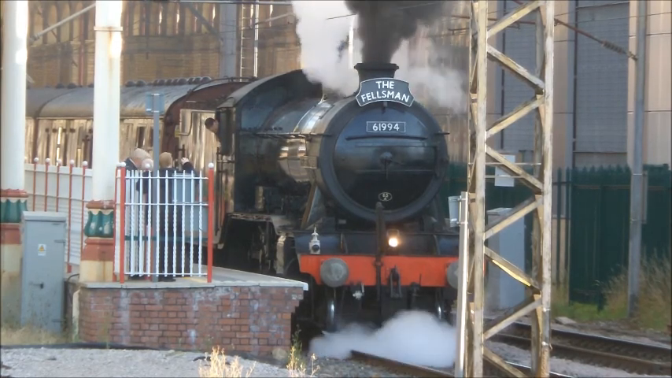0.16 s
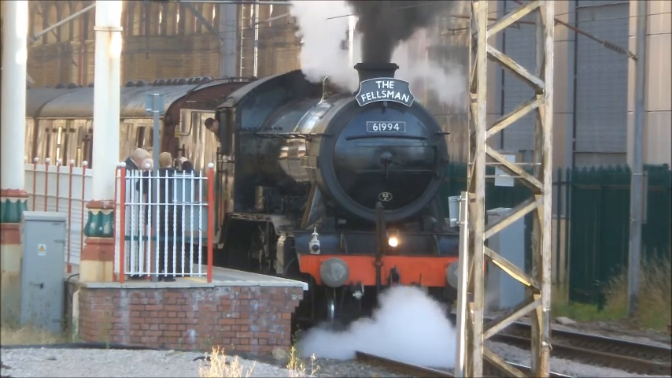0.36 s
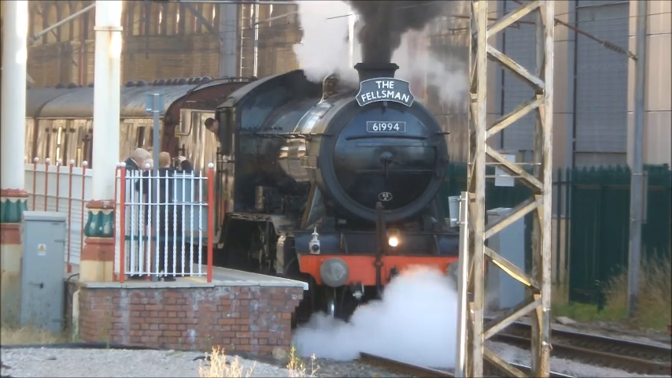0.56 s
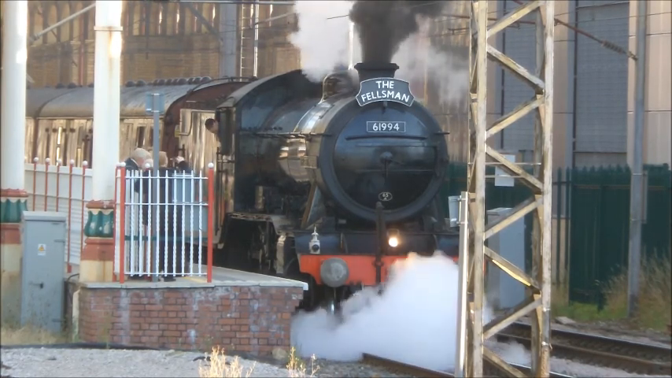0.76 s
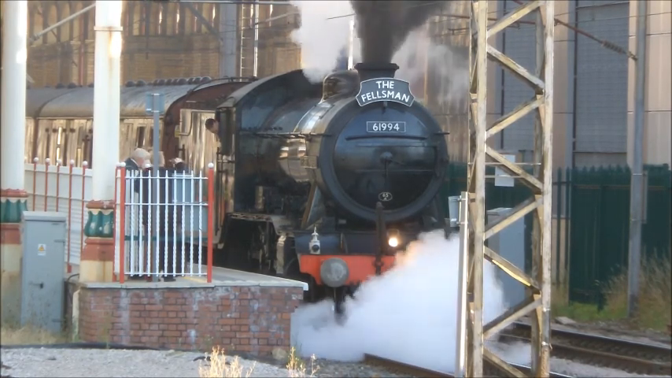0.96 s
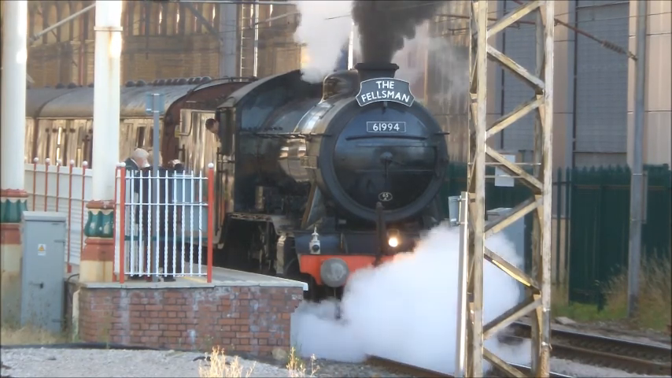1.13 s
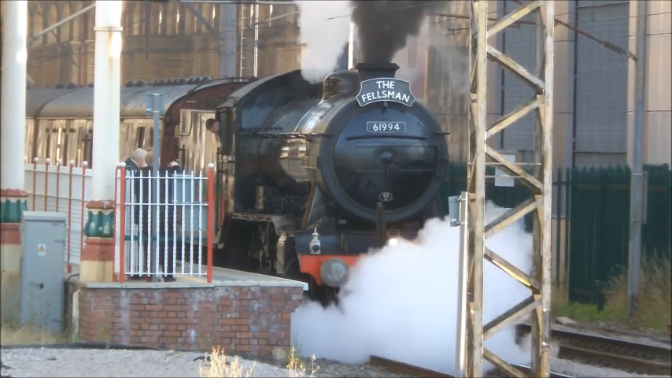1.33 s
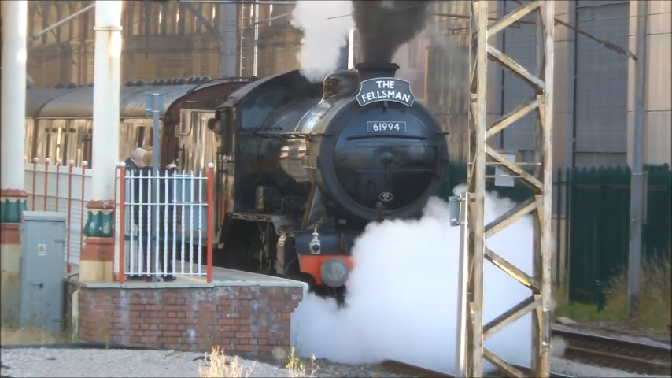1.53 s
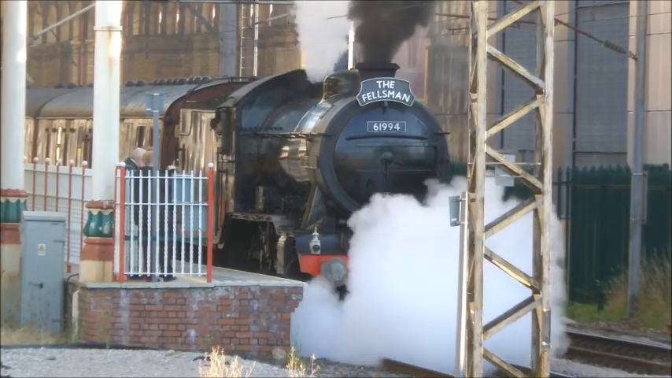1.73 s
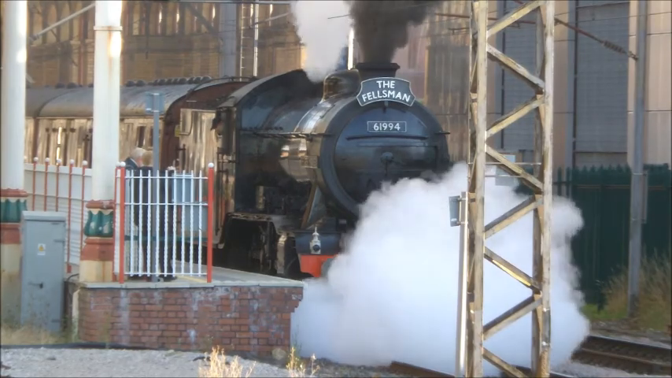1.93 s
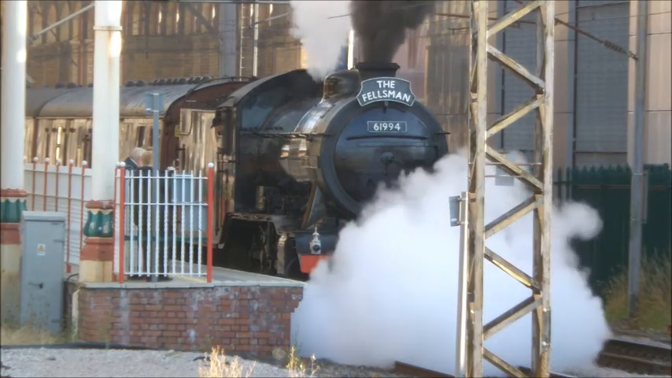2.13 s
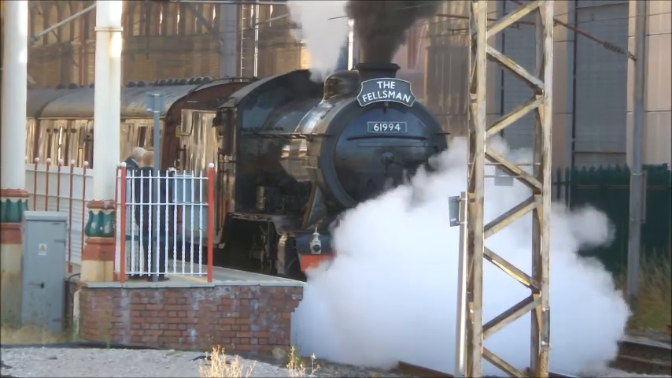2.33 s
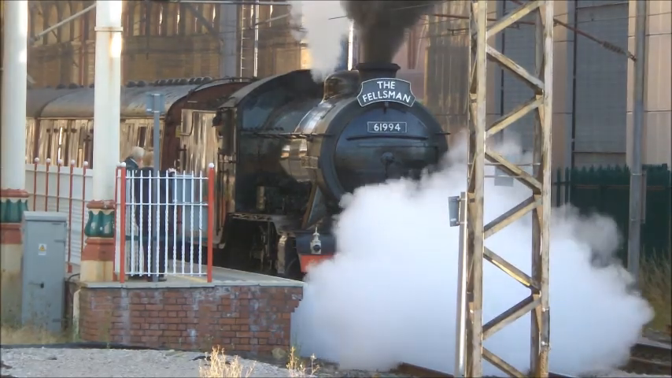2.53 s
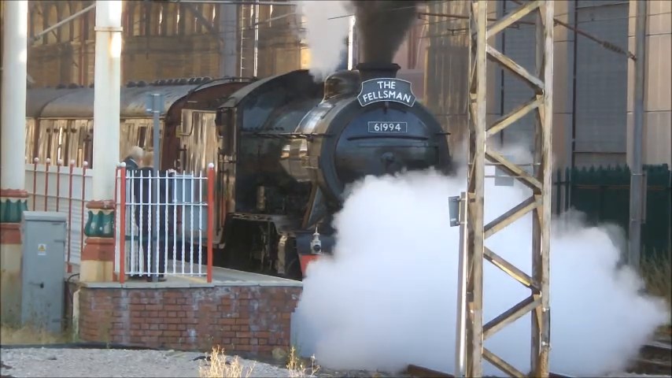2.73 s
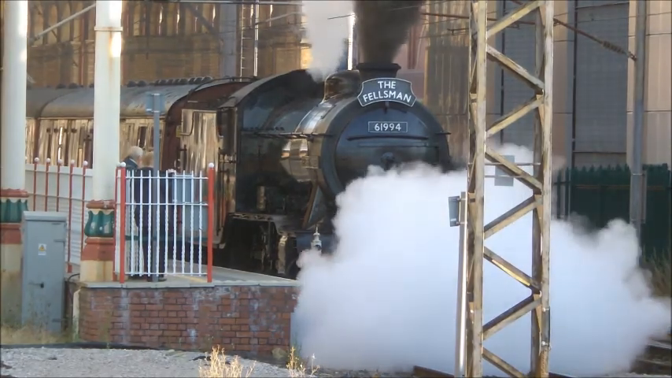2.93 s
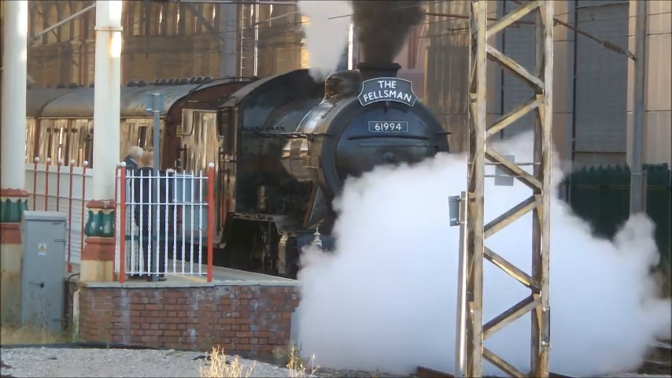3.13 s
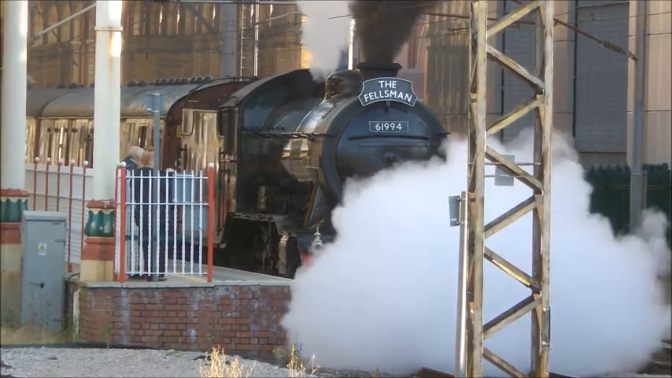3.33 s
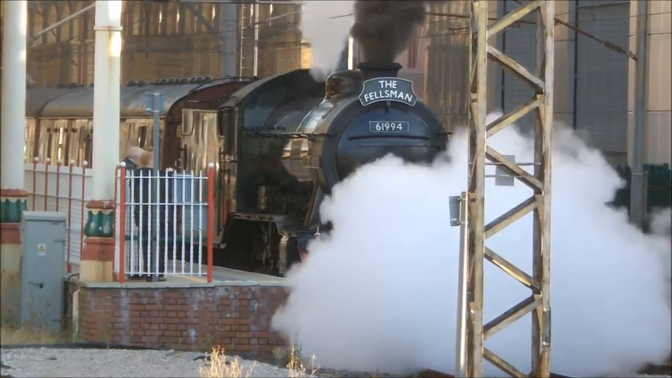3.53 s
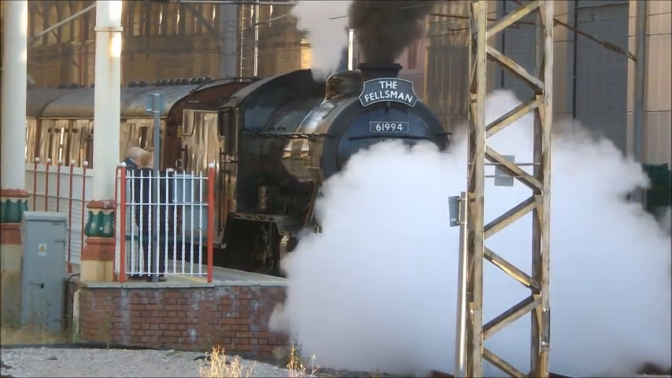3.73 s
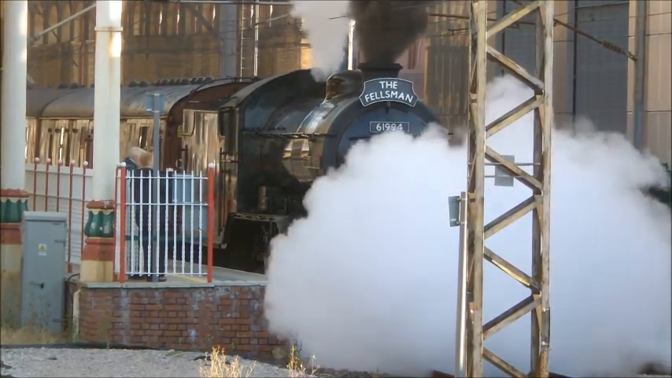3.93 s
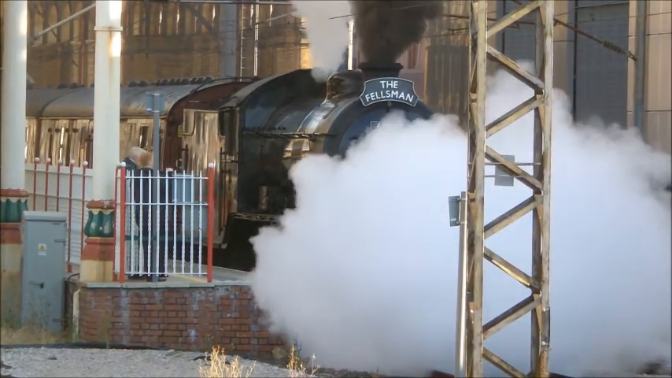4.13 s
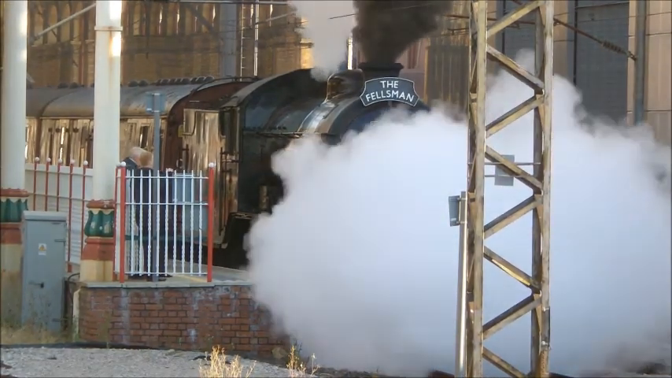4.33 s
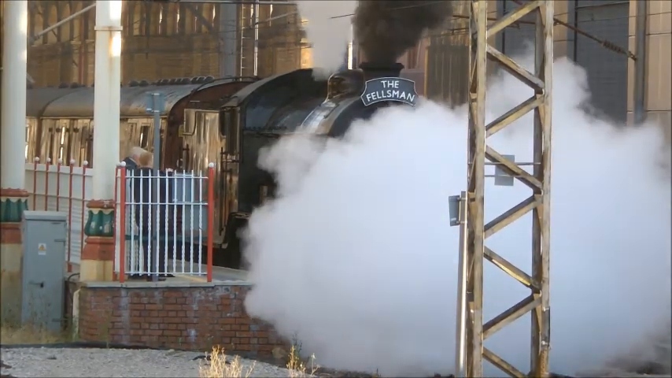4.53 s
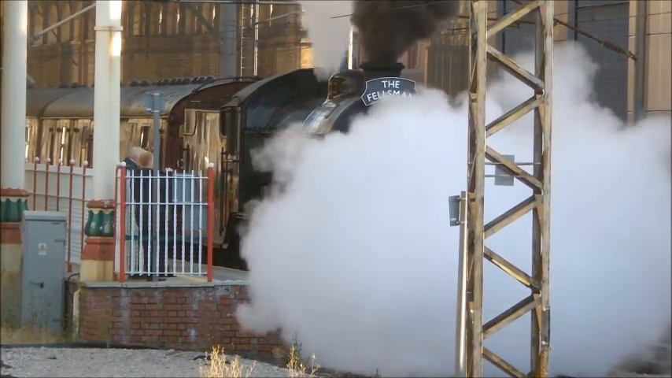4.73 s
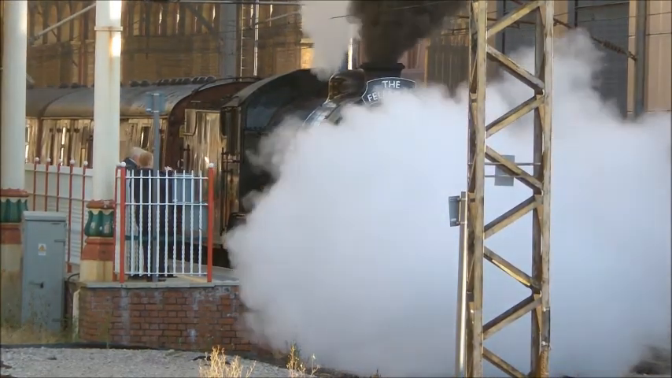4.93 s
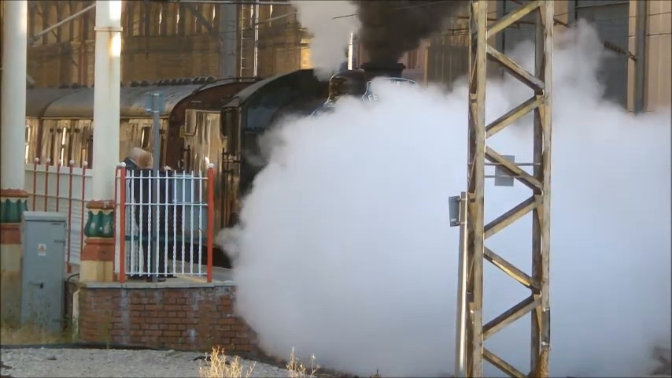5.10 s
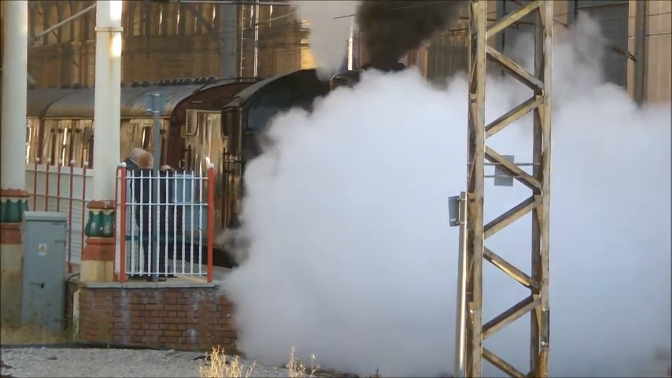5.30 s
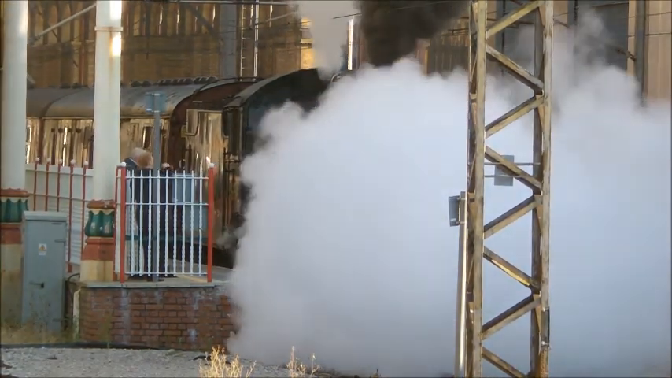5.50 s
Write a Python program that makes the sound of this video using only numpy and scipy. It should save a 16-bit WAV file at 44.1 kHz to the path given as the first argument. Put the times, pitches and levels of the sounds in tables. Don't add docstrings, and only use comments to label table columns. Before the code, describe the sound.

Quiet blower hiss from a standing steam engine grows within a second into loud, shifting jets of steam that last to the end.

```python
import sys
import numpy as np
from scipy import signal
from scipy.fft import rfft, irfft, next_fast_len
from scipy.io import wavfile
from scipy.ndimage import uniform_filter1d

SR = 44100
rng = np.random.default_rng(int(sys.argv[2]) if len(sys.argv) > 2 else 0)


def master_out(mix):
    frames = np.transpose(np.atleast_2d(mix))
    ceiling = np.clip(frames, -1, 1)
    pcm = np.round(ceiling * 32767).astype(np.int16)
    wavfile.write(sys.argv[1], SR, pcm)


def amplitude_ratio(level_db):
    exponent = np.asarray(level_db, float) / 20
    return 10 ** exponent


N = 245195
SIZE = next_fast_len(N)
HZ = np.maximum(np.arange(SIZE // 2 + 1) * SR / SIZE, 1)

# hz, level_db (per Hz)
BLOWER_COLOUR = [(88, -36), (150, -39), (246, -28), (374, -15.5), (488, -17.5), (558, -10.5), (757, -7),
                 (969, -8.5), (1270, -2.5), (1450, -5.5), (3470, -7), (7430, -18), (9520, -25),
                 (14200, -16)]
FIRST_COLOUR = [(88, -72), (150, -37), (189, -51), (321, -21), (498, -30), (1030, -13), (1650, -10.5),
                (2450, -6), (3100, -10), (3800, -3.5), (4700, -2), (5600, -6), (7290, -16), (9160, -13.5),
                (12400, -19), (14200, -24)]
SECOND_COLOUR = [(88, -69), (150, -43), (220, -34), (411, -19), (479, -23), (688, -22), (1560, -8.5),
                 (2160, 1.5), (2810, -6.5), (4620, 2.5), (7160, -13), (9520, -4), (13400, -20),
                 (14200, -14)]
THIRD_COLOUR = [(88, -69), (150, -60), (292, -26), (404, -28.5), (488, -37), (701, -19), (1240, -11),
                (1370, -6.5), (2240, -3), (2710, -1.5), (4040, 3), (6260, -6), (9520, -9.5), (14200, -16.5)]
FOURTH_COLOUR = [(88, -75), (150, -67), (396, -27), (537, -41), (626, -17), (771, -28), (969, -14),
                 (1650, -7), (2710, -9.5), (4040, 1), (8020, -11.5), (9890, -16.5), (13200, -14),
                 (14200, -11)]
SPIT_COLOUR = [(88, -78), (150, -57), (340, -20.5), (817, -36), (969, -5.5), (1290, -17.5), (1890, -5),
               (3160, -5), (4120, 0), (6510, -8.5), (12400, -7.5), (14200, -13.5)]
# pitch_hz, width_hz, level_db
BLOWER_WHISTLES = [(1380, 70, -5), (2140, 290, 0.5), (3370, 79, -2), (9500, 1500, -10), (10400, 200, -13),
                   (13100, 150, -24)]
FIRST_WHISTLES = [(1856, 200, -3.5), (2210, 105, -2.5), (2817, 100, -3), (3384, 230, -5), (4070, 170, 0),
                  (4384, 95, 3), (5090, 170, -1), (8760, 230, -10)]
SECOND_WHISTLES = [(2220, 170, 7), (2610, 150, 8.5), (4130, 96, -27), (4510, 240, -38), (5320, 91, 12),
                   (5640, 44, 10), (9730, 170, 10), (11100, 130, -25)]
THIRD_WHISTLES = [(2210, 86, -12), (3200, 100, -2), (4800, 70, -1), (5630, 76, 1.5), (6700, 76, -3),
                  (7400, 80, -5), (8540, 160, -11), (9400, 90, -9)]
FOURTH_WHISTLES = [(2080, 110, -26), (2980, 120, -3.5), (3374, 67, 1.5), (3700, 220, -4), (7240, 86, -10.5),
                   (9080, 170, -9), (9980, 320, -8), (12700, 61, -20)]
SPIT_WHISTLES = [(4280, 310, -11), (12300, 400, -13)]
WHISTLES_DB = [-2, 2, -8.5, 3.5, 2.5, -10]
JET_LEADS_US = [3, 1.5, 1.5, 14, 17, 1.5]
# first_crest_hz, spacing_hz, strength (0-1), dull_above_hz
NEAR_REFLECTION = (414, 238, 0.18, 1070)

# time_s, level_db
BLOWER_FLOW = [(0, -48.5), (.2, -50), (.64, -48.5), (.9, -46.5), (3.0, -47), (3.4, -44), (3.9, -46.5),
               (4.8, -43), (5.56, -40.5)]
# time_s, level_db (of a fully open jet)
PRESSURE = [(0, -52), (.2, -56.5), (.48, -52.5), (.8, -42.5), (1.0, -37.5), (1.3, -36), (1.7, -33),
            (2.3, -33.5), (2.6, -31.5), (3.1, -31.5), (3.7, -30.5), (4.2, -31), (4.6, -29), (4.9, -29),
            (5.1, -29.5), (5.56, -29.5)]
# open_s, shut_s, level_db
FIRST_BLOWS = [
    (0, .75, -2),
    (.98, 1.1, -6.5),
    (1.3, 2.36, -1.5),
    (3.05, 3.54, -8.5),
    (4.33, 4.42, -10),
    (4.94, 5.06, -4),
    (5.44, 5.5, -13),
]
SECOND_BLOWS = [
    (0, .05, -5),
    (.9, 0.956, -4.5),
    (1.133, 1.205, -3.5),
    (1.92, 2.1, -12),
    (2.38, 2.4, -5.5),
    (2.63, 3.093, -0.5),
    (3.218, 3.54, -9),
    (4.178, 4.456, -8.5),
    (4.958, 5.0, -6.5),
    (5.28, 5.322, -9.5),
]
THIRD_BLOWS = [
    (.9, .97, -12),
    (1.76, 2.3, -10.5),
    (2.44, 2.49, -2),
    (2.778, 3.06, -12),
    (3.232, 4.066, -2.5),
    (4.19, 4.42, -2.5),
    (4.66, 4.845, -4.5),
]
FOURTH_BLOWS = [
    (0, .2, -5),
    (1.66, 1.78, -15.5),
    (2.08, 2.26, -9),
    (2.88, 3.21, -6),
    (3.48, 3.56, -13),
    (3.86, 4.4, -6.5),
    (4.465, 4.78, -.5),
    (5.08, 5.56, -1),
]
SPIT_BLOWS = [(0, .05, -9), (1.14, 1.3, -10.5), (1.58, 1.68, -10), (1.81, 1.86, -11), (2.1, 2.42, -7.5),
              (2.534, 2.593, -2), (2.727, 2.796, -4), (2.946, 3.124, -9), (3.2, 3.4, -16),
              (3.796, 4.3, -13.5), (4.4, 4.9, -16.5), (4.99, 5.56, -7)]
LEAK_DB = [-22, -23, -20, -14, -28.5]
OPEN_DB_PER_S = [60, 61, 62, 62.5, 110]
SHUT_DB_PER_S = [59, 60.7, 61, 62, 110]

# hz, level_db (per Hz)
SPRAY_COLOUR = [(7000, -29), (8800, 4.5), (11000, -2), (13000, -12), (14200, 0.5)]
# time_s, left_lead_us
SPRAY_LEAD = [(0, 2.5), (2.5, 1.5), (2.9, 6.5), (4.2, 11), (5.56, 14)]
# start_s, end_s, level_db (over the pressure)
SPRAY_BURSTS = [
    (0, .02, -9),
    (1.2, 1.25, -7),
    (1.82, 1.84, -15),
    (2.55, 2.59, 3),
    (2.8, 2.83, -14),
    (3.08, 3.11, -15),
    (5.02, 5.04, -13),
    (5.3, 5.56, -7),
]
SPRAY_DB = -4.5
SPRAY_STEADY_DB, SPRAY_FOLLOWS = -47, 1.15
BURST_RISE_DB_PER_S, BURST_FALL_DB_PER_S = 130, 170

# hz, spread_db
CLOUD = [(300, -2.3), (2000, 0.31), (6000, 0.5), (12000, 1.5)]
# hz, spread_db
GLINT = [(300, 1.15), (1500, 1.5), (5000, 1.5), (12000, 0.1)]

# hz, level_db (per Hz)
SCATTER_COLOUR = [(88, -78), (150, -48), (246, -40), (292, -46), (558, -38), (1150, -14.5), (1720, -15),
                  (1850, -10.5), (2560, -3.5), (4980, -1.5), (9700, -6.5), (13200, -18), (14200, -20)]
SCATTER_DB, SCATTER_S = -11.5, 0.1
# hz, level_db (per Hz)
STATION_COLOUR = [(150, -55), (250, -24), (728, -12), (1200, -15), (1890, -7), (2230, -1), (2500, -12),
                  (3250, -42), (5500, -120)]
STATION_DB = -68

# time_s, level_db
RUMBLE = [(0, -88), (.7, -94), (2.0, -88), (2.9, -86), (3.4, -85), (4.4, -81.5), (5.56, -79)]
# hz, level_db (per Hz)
RUMBLE_COLOUR = [(13, -36), (22, -14), (35, -13), (70, -7), (97, 3), (134, -5), (200, -5.5), (260, -32),
                 (440, -120)]
# hz, level_db (per Hz)
WIND_COLOUR = [(15, -17), (40, -2), (100, -7), (190, -21), (260, -8), (340, -45)]
# start_s, end_s, level_db
GUSTS = [
    (.23, .25, -83),
    (.65, .67, -85),
    (3.64, 3.66, -79),
    (3.73, 3.76, -83),
    (4.13, 4.21, -79),
    (4.39, 4.44, -81),
    (4.25, 4.29, -86),
    (4.72, 4.76, -82),
    (5.37, 5.43, -75),
]
BREEZE_DB, BREEZE_DROPS_S, CALM_DB = -94, 2.46, -103
GUST_DB_PER_S, WIND_PAN_DB = 330, -3
# time_s, peak_db, pitch_hz, length_s, left_minus_right_db
PATS = [
    (.645, -78, 100, 0.028, -12),
    (3.652, -68, 75, .014, -13),
    (3.745, -63, 100, 0.009, -17),
]

PORTS = np.array([[1], [-1]])


def in_time(rows):
    s, *columns = np.transpose(rows)
    return np.array([np.interp(np.arange(N) / SR, s, c) for c in columns])


def at_hz(points, hz):
    point_hz, level_db = np.array(points)[:, 0], np.array(points)[:, 1]
    return np.interp(np.log(hz), np.log(np.maximum(point_hz, 1)), level_db)


def noise(gain, lead_s=0.):
    coloured = rfft(rng.standard_normal(SIZE)) * gain
    phase = np.exp(1j * np.pi * HZ * lead_s * PORTS)
    pair = irfft(coloured * phase, SIZE)[:, :N]
    return pair / np.sqrt(np.mean(pair ** 2))


def blows(rows, rest_db, rise_db_per_s, fall_db_per_s):
    t = np.arange(0, N + 64, 64) / SR
    start_s, end_s, db = np.transpose(rows)[:, :, None]
    rise_loss_db = rise_db_per_s * np.maximum(start_s - t, 0)
    fall_loss_db = fall_db_per_s * np.maximum(t - end_s, 0)
    power = np.sum(amplitude_ratio(db - rise_loss_db - fall_loss_db) ** 2, axis=0)
    puffs = np.interp(np.arange(N) / SR, t, power)
    return 10 * np.log10(amplitude_ratio(rest_db) ** 2 + puffs)


def flows():
    valves = [FIRST_BLOWS, SECOND_BLOWS, THIRD_BLOWS, FOURTH_BLOWS, SPIT_BLOWS]
    openings = [blows(*valve) for valve in zip(valves, LEAK_DB, OPEN_DB_PER_S, SHUT_DB_PER_S)]
    return np.vstack([in_time(BLOWER_FLOW), in_time(PRESSURE) + np.array(openings)])


def jet_colour(spectrum, whistles, whistles_db):
    power = amplitude_ratio(at_hz(spectrum, HZ)) ** 2
    for hz, width_hz, db in whistles:
        resonance = 1 / (1 + (2 * (HZ - hz) / width_hz) ** 2) ** 2
        power = power + amplitude_ratio(db + whistles_db) ** 2 * resonance
    crest_hz, spacing_hz, strength, dull_hz = NEAR_REFLECTION
    echo_gain = strength / (1 + (HZ / dull_hz) ** 2)
    echo = echo_gain * np.exp(2j * np.pi * (HZ - crest_hz) / spacing_hz)
    return np.sqrt(power) * np.abs(1 + echo)


def jets(flow_db):
    colours = [BLOWER_COLOUR, FIRST_COLOUR, SECOND_COLOUR, THIRD_COLOUR, FOURTH_COLOUR, SPIT_COLOUR]
    whistles = [BLOWER_WHISTLES, FIRST_WHISTLES, SECOND_WHISTLES, THIRD_WHISTLES, FOURTH_WHISTLES, SPIT_WHISTLES]
    out = np.zeros((2, N))
    for k, db in enumerate(flow_db):
        colour = jet_colour(colours[k], whistles[k], WHISTLES_DB[k])
        out += amplitude_ratio(db) * noise(colour, JET_LEADS_US[k] / 10 ** 6)
    return out


def spray():
    hiss = noise(amplitude_ratio(at_hz(SPRAY_COLOUR, HZ)))
    slope = np.gradient(hiss, axis=1) * SR
    pressure_db, = in_time(PRESSURE)
    steady_db = SPRAY_STEADY_DB + SPRAY_FOLLOWS * (pressure_db + 32) - pressure_db
    level_db = pressure_db + blows(SPRAY_BURSTS, steady_db, BURST_RISE_DB_PER_S, BURST_FALL_DB_PER_S)
    lead_s = in_time(SPRAY_LEAD) / 10 ** 6
    return amplitude_ratio(level_db + SPRAY_DB) * (hiss + slope * lead_s * PORTS / 2)


def shimmer(x, spread, width_hz, hold_s, size):
    hz, s, frames = signal.stft(x, SR, nperseg=size)
    field = rng.standard_normal(frames.shape[1:])
    for axis, span in enumerate([width_hz / hz[1], hold_s / (s[1] - s[0])]):
        for _ in range(2):
            field = uniform_filter1d(field, max(round(span), 1), axis=axis)
    gain = amplitude_ratio(field / field.std() * at_hz(spread, hz + 1)[:, None])
    return signal.istft(frames * gain, SR, nperseg=size)[1][:, :N]


def yard(flow_db):
    keep = np.exp(-1 / (SCATTER_S * SR))
    power = np.sum(amplitude_ratio(flow_db) ** 2, axis=0)
    held = signal.lfilter([1 - keep], [1, -keep], power, zi=[keep * power[0]])[0]
    scattered = amplitude_ratio(SCATTER_DB) * np.sqrt(held) * noise(amplitude_ratio(at_hz(SCATTER_COLOUR, HZ)))
    far = amplitude_ratio(STATION_DB) * noise(amplitude_ratio(at_hz(STATION_COLOUR, HZ)))
    return (scattered + far) * PORTS


def wind():
    colour = amplitude_ratio(at_hz(WIND_COLOUR, HZ))
    lumps = np.array([noise(colour)[0], noise(colour)[0]])
    rumble = amplitude_ratio(in_time(RUMBLE)) * noise(amplitude_ratio(at_hz(RUMBLE_COLOUR, HZ)))
    breeze = (0, BREEZE_DROPS_S, BREEZE_DB)
    gust_db = blows([breeze, *GUSTS], CALM_DB, GUST_DB_PER_S, GUST_DB_PER_S)
    return rumble + amplitude_ratio(gust_db + 4.5 + PORTS / 2 * WIND_PAN_DB) * lumps


def pats():
    out = np.zeros((2, N))
    for s, db, hz, length_s, pan_db in PATS:
        t = np.arange(N) / SR - s
        bump = np.exp(-np.minimum((2 * t / length_s) ** 2, 50))
        out += amplitude_ratio(db + PORTS / 2 * pan_db) * np.sin(2 * np.pi * hz * t) * bump
    return out


def scene():
    flow_db = flows()
    steam = jets(flow_db) + spray()
    steam = shimmer(steam, CLOUD, width_hz=600, hold_s=0.14, size=512)
    steam = shimmer(steam, GLINT, width_hz=45, hold_s=0.3, size=2048)
    return steam + yard(flow_db) + wind() + pats()


def band_limit(x):
    return signal.sosfilt(signal.butter(12, 15030, fs=SR, output="sos"), x)


def record(dry):
    top_cut = signal.cheby2(10, 45, 15030, fs=SR, output="sos")
    mix = signal.sosfilt(top_cut, dry)
    return band_limit(mix)


dry = scene()
out = record(dry)
master_out(out)
```